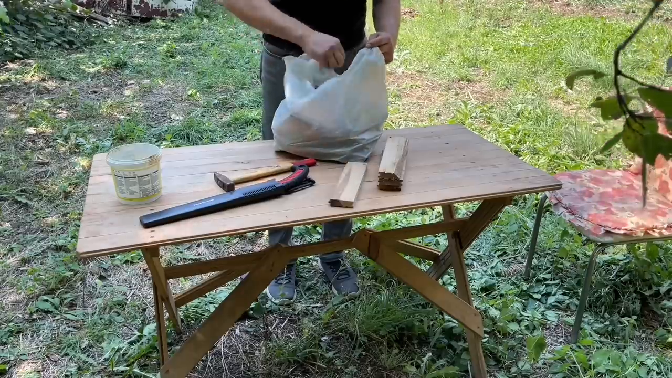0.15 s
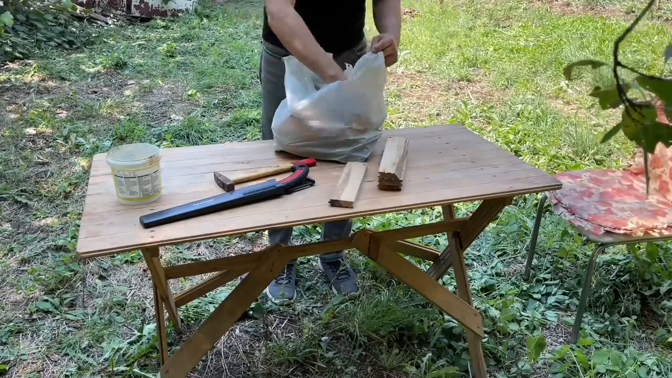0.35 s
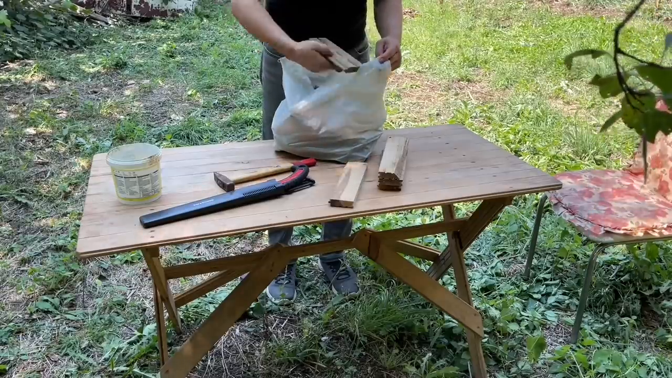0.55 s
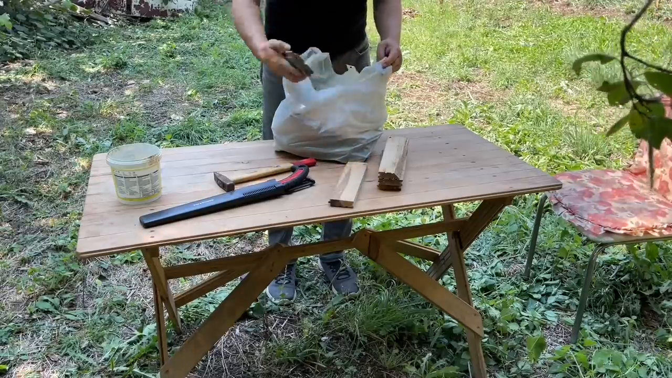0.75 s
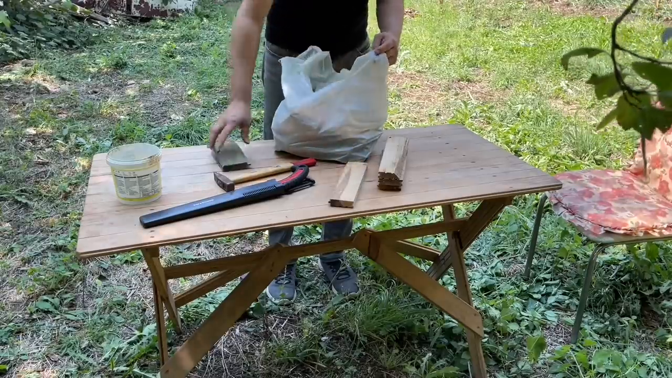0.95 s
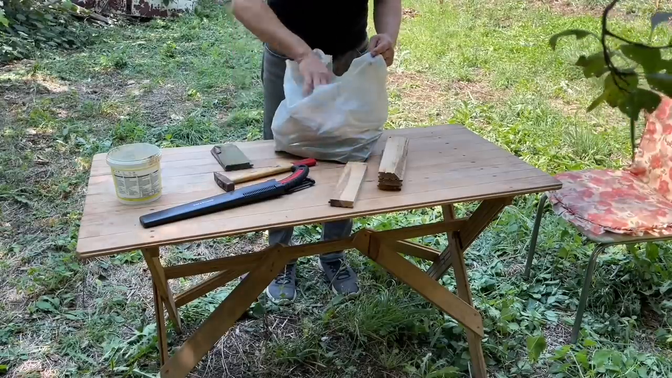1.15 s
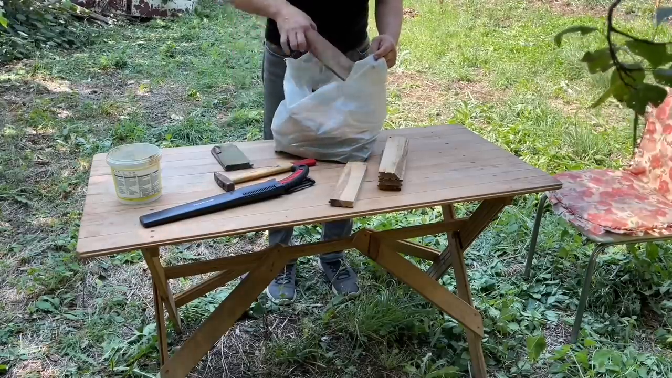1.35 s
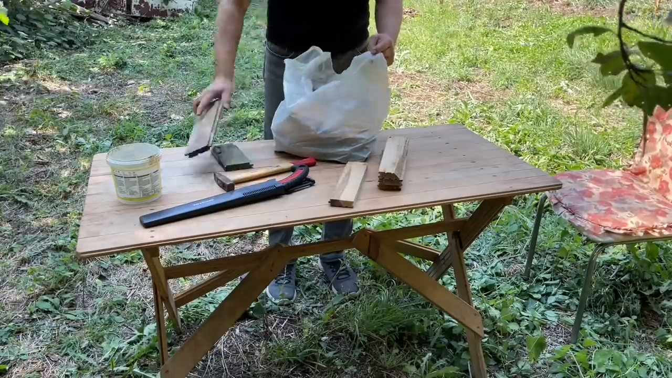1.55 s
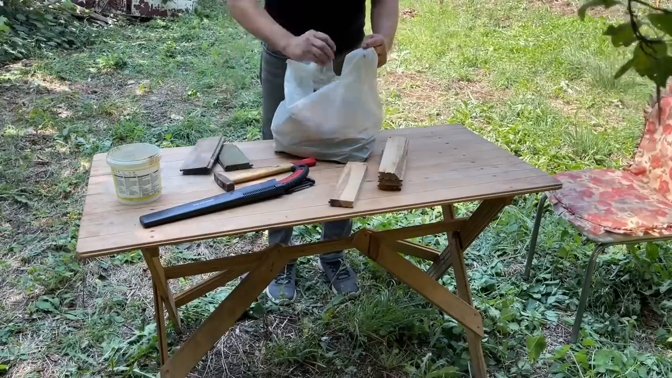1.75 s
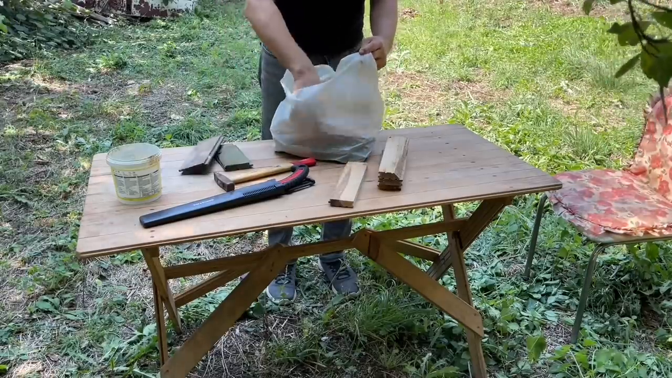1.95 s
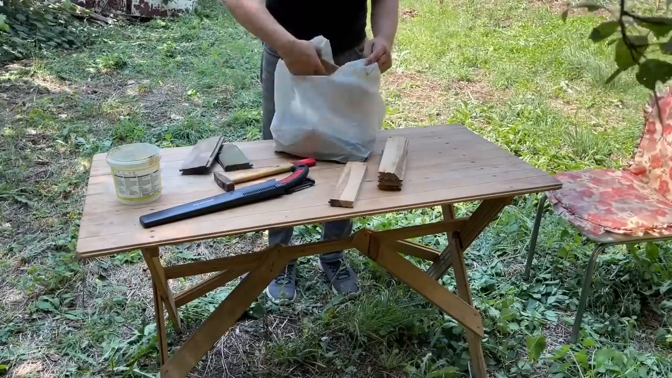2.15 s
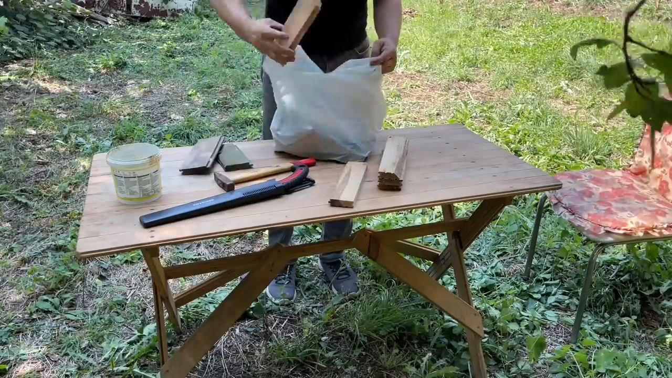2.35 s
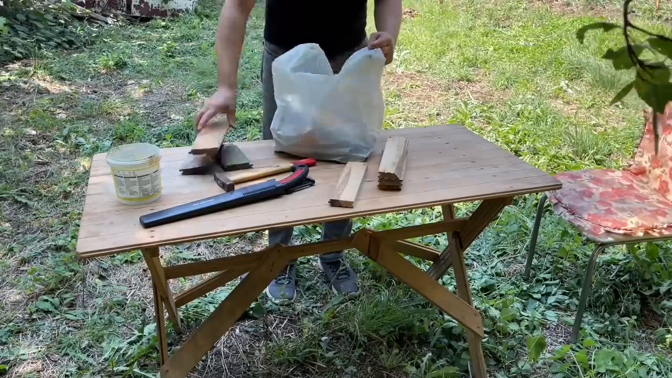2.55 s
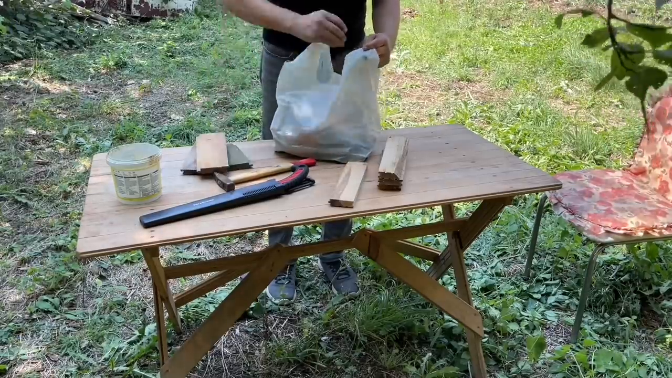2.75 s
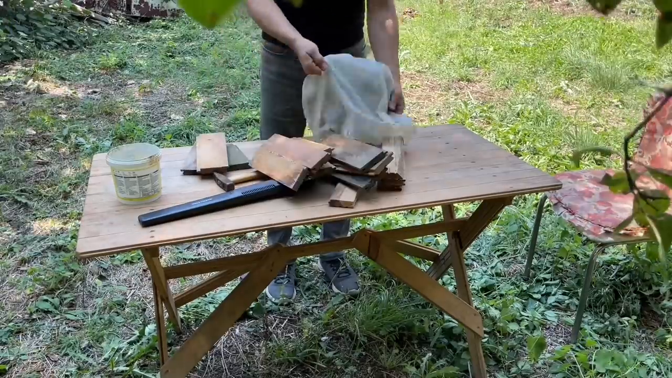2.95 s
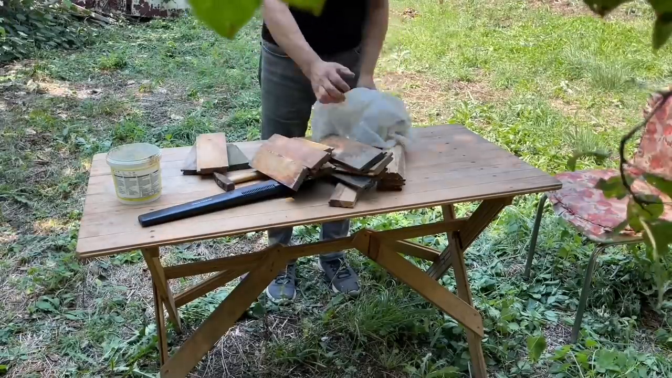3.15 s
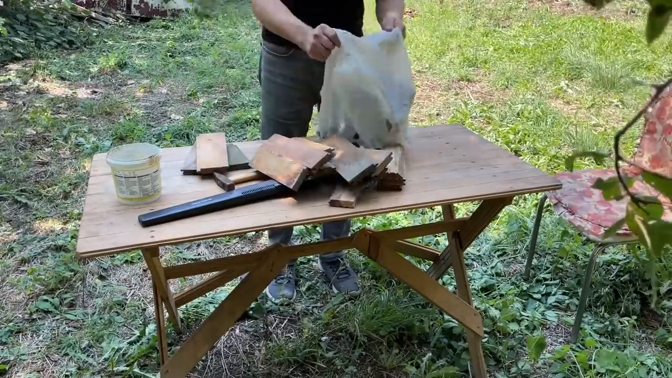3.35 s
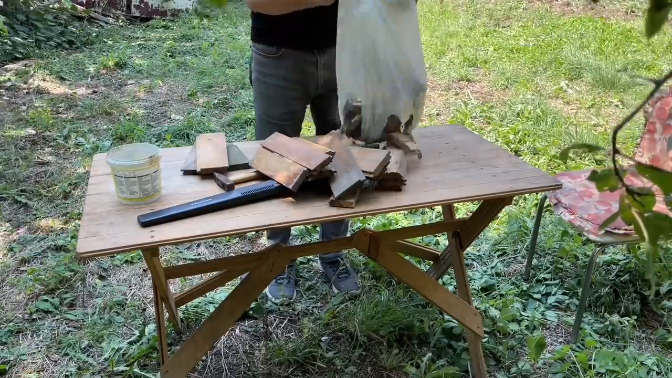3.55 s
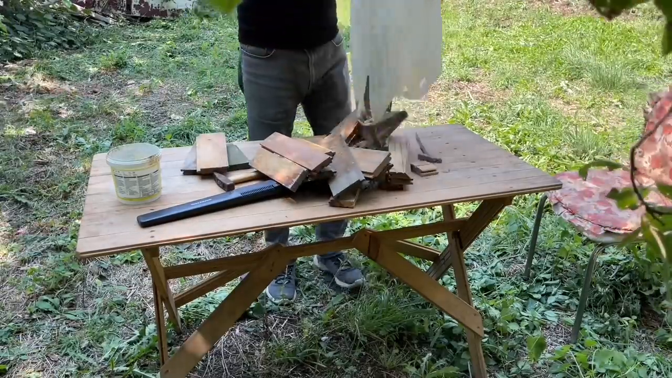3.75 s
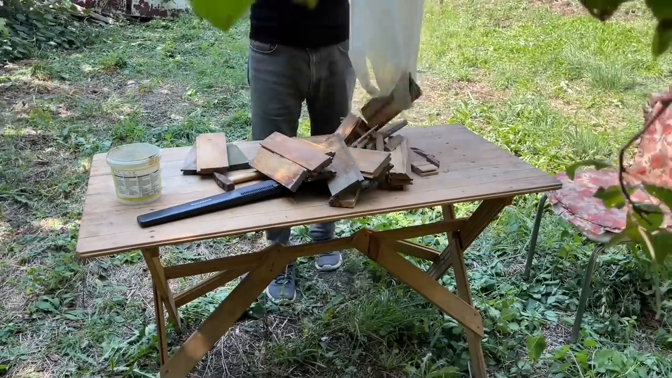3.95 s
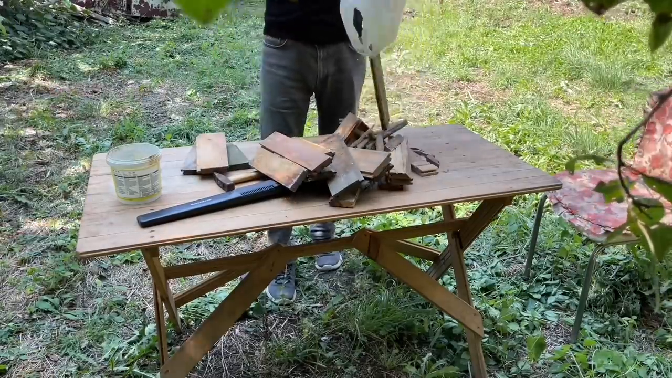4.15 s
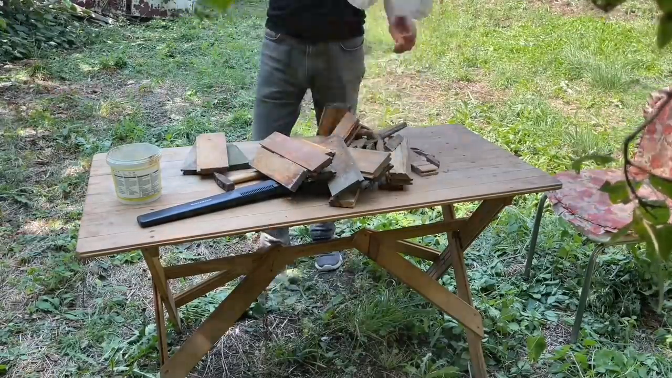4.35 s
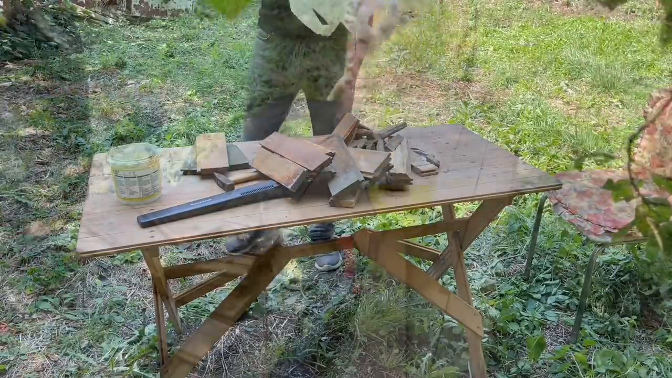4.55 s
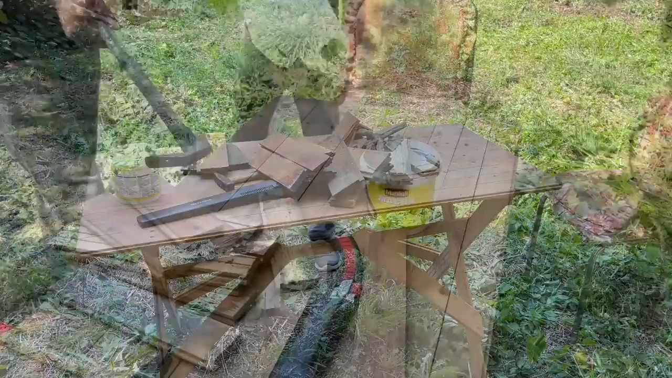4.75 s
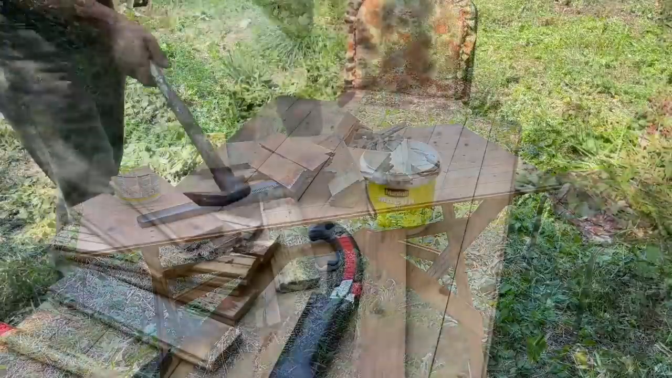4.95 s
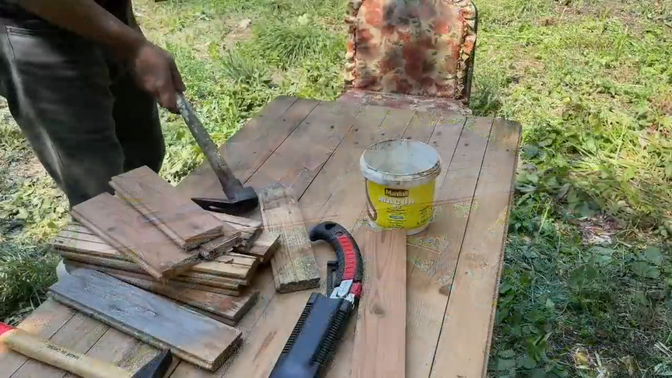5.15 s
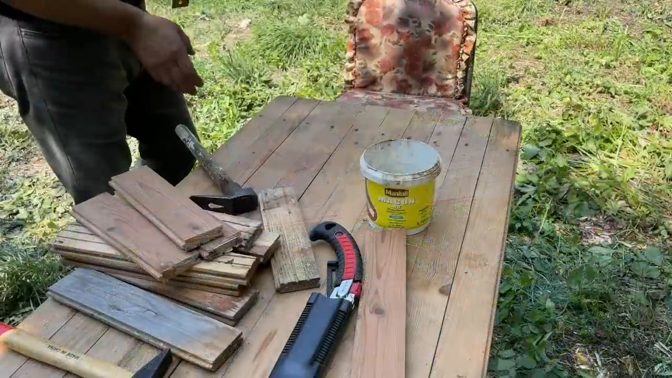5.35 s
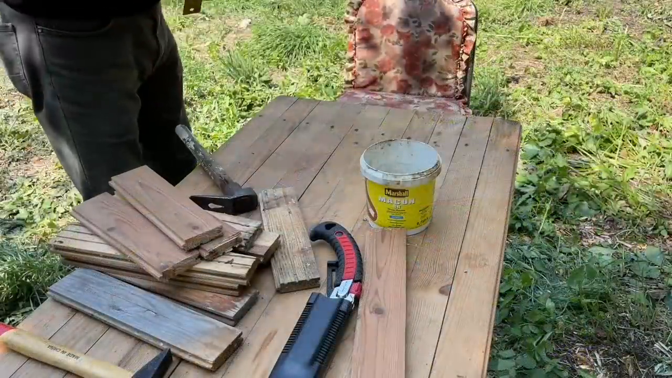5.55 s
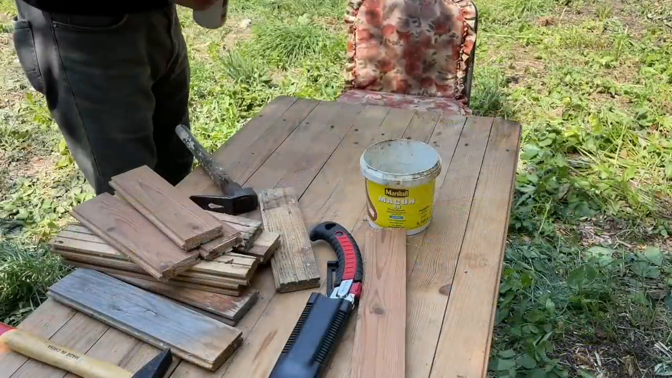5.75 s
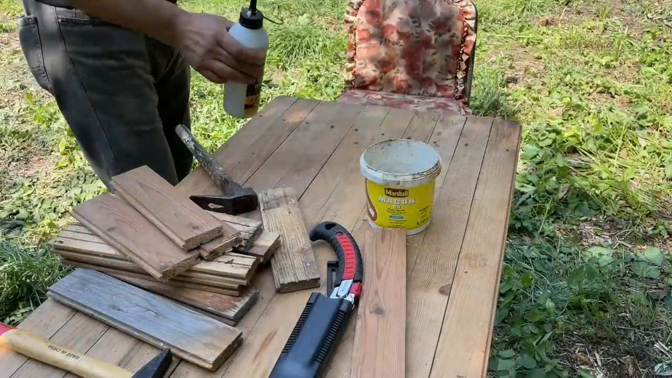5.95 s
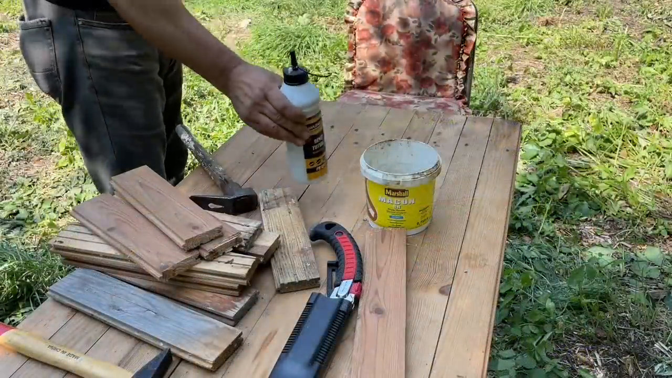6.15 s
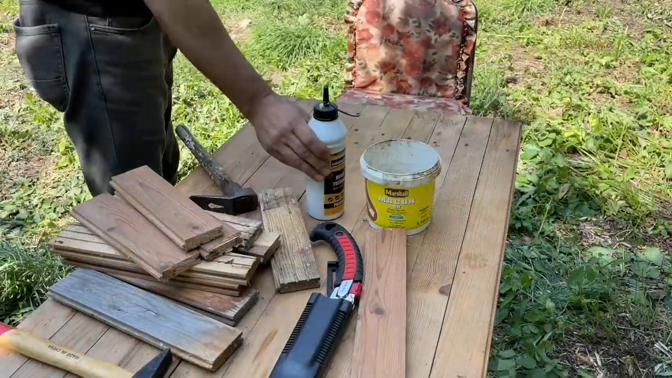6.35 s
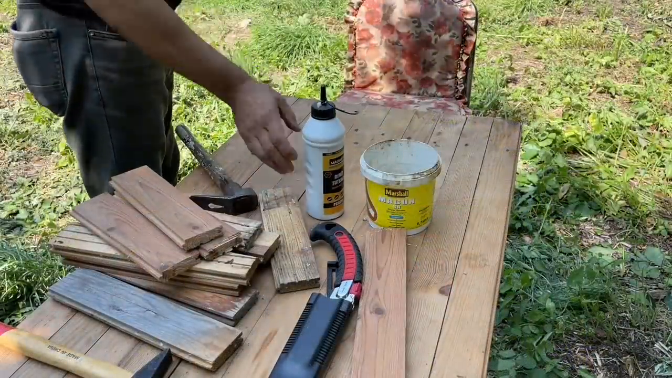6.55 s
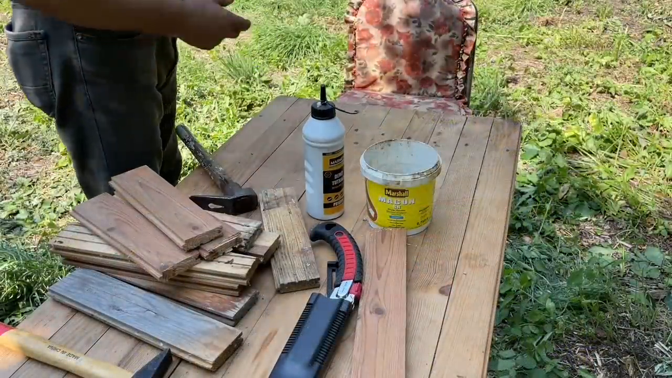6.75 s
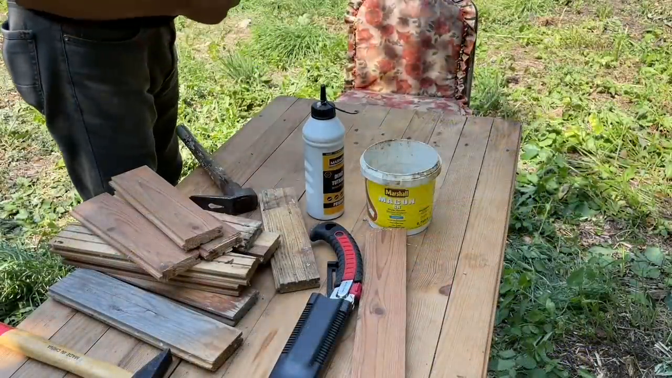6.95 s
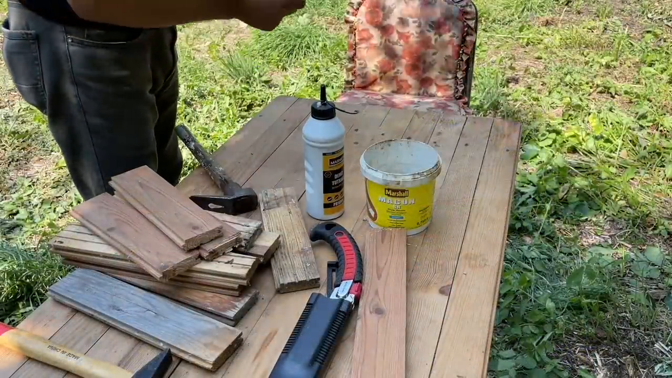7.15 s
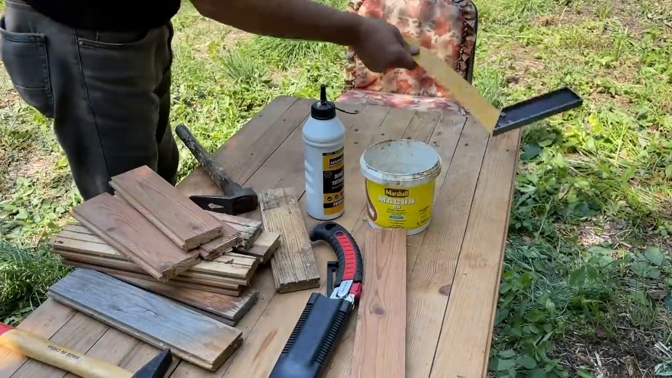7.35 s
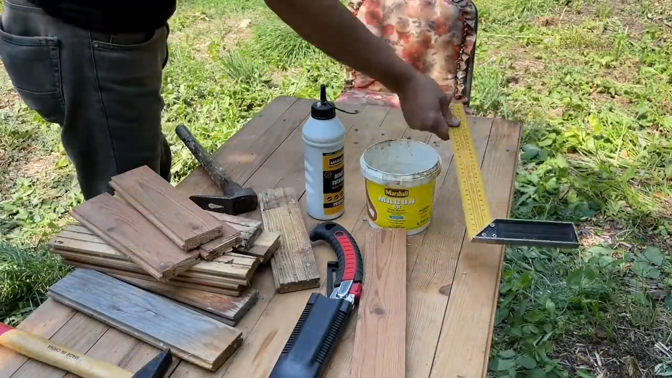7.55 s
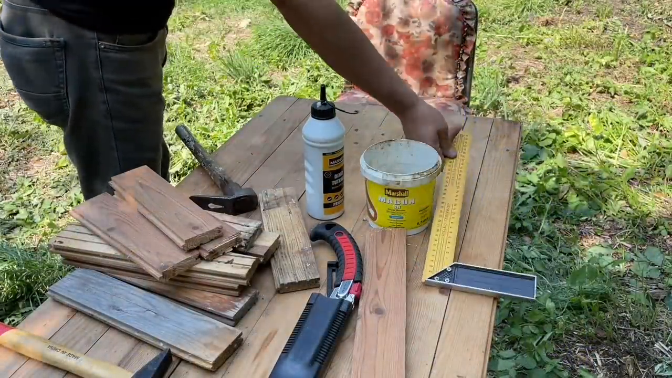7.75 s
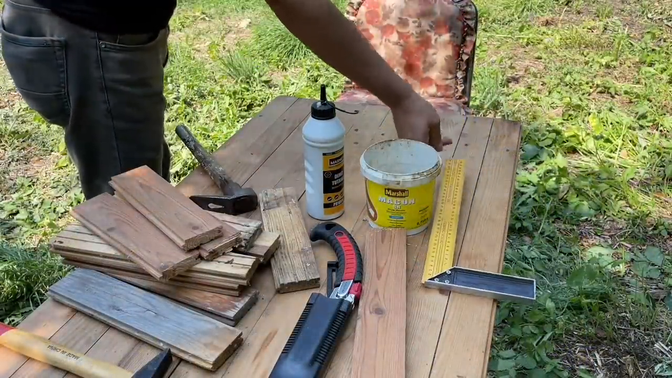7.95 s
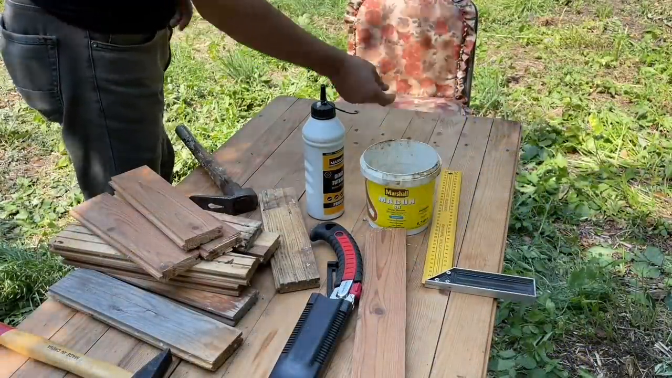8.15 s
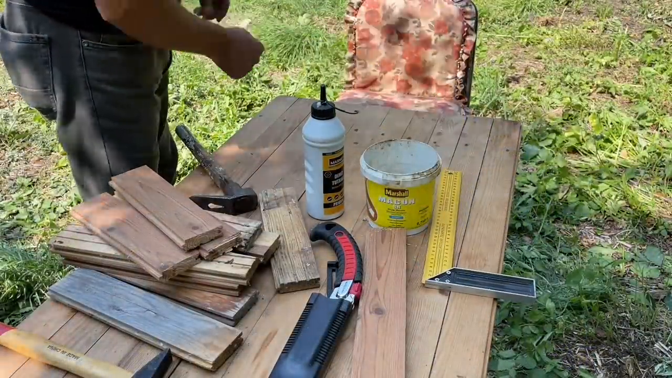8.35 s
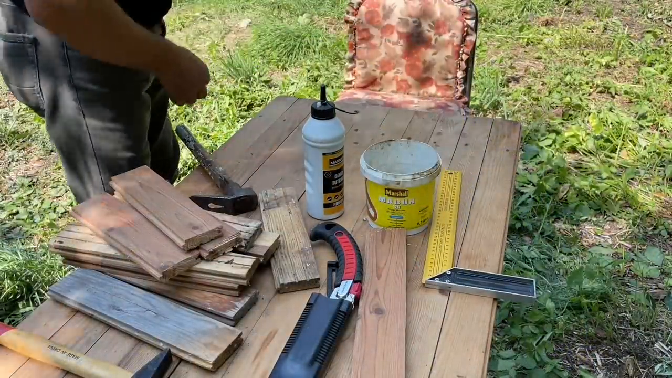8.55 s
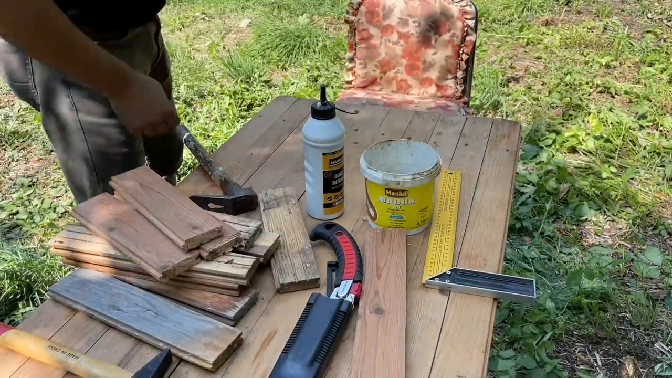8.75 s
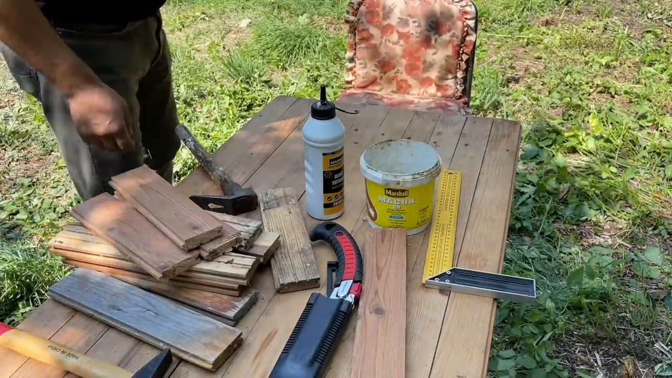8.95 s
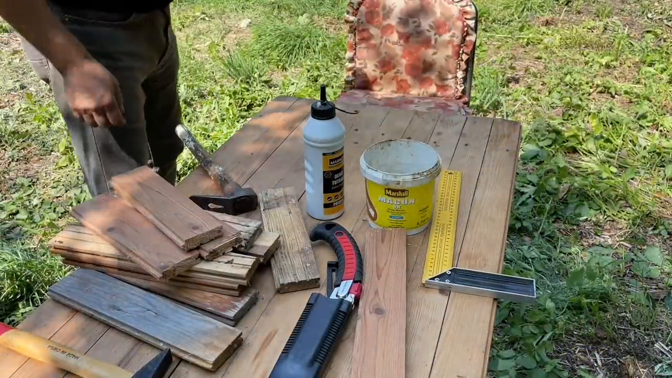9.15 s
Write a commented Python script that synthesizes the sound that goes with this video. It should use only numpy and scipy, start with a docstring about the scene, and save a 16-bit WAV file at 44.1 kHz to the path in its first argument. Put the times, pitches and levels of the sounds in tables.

```python
"""Offcuts of wood knock on a plank table outdoors: each blow shakes many short-lived modes of piece and planks.
They are lifted from a rustling plastic bag, whose film crackles in tiny snaps of noise, then tipped out.
From a second, duller viewpoint a hammer, a bottle and a steel square are set down with small clicks;
ringing steel modes and knocking wood let the square rattle to rest.
Wind, made of low noise and lone wobbly bursts, buffets the microphone over a faint hiss of filtered noise."""
import sys
import numpy as np
from scipy import signal
from scipy.fft import rfft, irfft, next_fast_len
from scipy.io import wavfile
from scipy.ndimage import uniform_filter1d, map_coordinates

SR = 44100
rng = np.random.default_rng(int(sys.argv[2]) if len(sys.argv) > 2 else 0)


def generate_wav(signal):
    """Clip the signal to [-1, 1] and save it as 16-bit WAV at the path in sys.argv[1]."""
    frames = np.transpose(np.atleast_2d(signal))
    scaled = np.clip(frames, -1, 1) * 32767
    pcm = np.round(scaled).astype(np.int16)
    wavfile.write(sys.argv[1], SR, pcm)


N = 409239
T = np.arange(N) / SR  # time [s]
LEFT_RIGHT = np.array([[1], [-1]])
OCTAVE = np.arange(-3.5, 4, .5)[:, None]  # half-octave groups of modes, in octaves from 1 kHz
TIP_S = 2.85  # the bag is tipped out from here on
CHANGE_S, CHANGE_LENGTH_S = 4.45, 0.01  # fade to the second viewpoint


def undb(db):
    """Turn dB into gain."""
    return 10 ** (np.asarray(db) / 20)


def unit(x):
    """Scale to rms 1."""
    return x / np.sqrt(np.mean(x ** 2))


def peak(x, db):
    """Scale to a peak level [dB]."""
    return x * undb(db) / np.max(np.abs(x))


def curve(spans):
    """Join the columns of a table by straight lines over time; silent outside it."""
    s, *columns = np.transpose(np.concatenate(spans))
    return [np.interp(T, s, c, left=-120, right=-120) for c in columns]


def colour(x, points):
    """Filter by (frequency [Hz], level [dB]) points, then scale to rms 1."""
    hz, db = np.transpose(points)
    size = next_fast_len(N)
    f = np.maximum(np.arange(size // 2 + 1) * SR / size, 1)
    gain = undb(np.interp(np.log(f), np.log(hz), db))
    return unit(irfft(rfft(x, size) * gain, size)[..., :N])


def band(x, lo_hz, hi_hz):
    """Keep the sound between two frequencies."""
    return signal.sosfilt(signal.butter(2, [lo_hz, hi_hz], "band", fs=SR, output="sos"), x)


def walk(rate):
    """Random levels held for 1 / rate seconds and smoothed; spread 1."""
    k = int(SR / rate)
    steps = np.repeat(rng.standard_normal(N // k + 1), k)
    return unit(uniform_filter1d(uniform_filter1d(steps, k), k)[:N])


def wide(alike):
    """Two-channel noise from a shared and an opposed part."""
    mid, side = rng.standard_normal((2, N))
    return np.sqrt(1 + alike) * mid + np.sqrt(1 - alike) * side * LEFT_RIGHT


def ring(push, modes, length_s=0.33):
    """Drive dying sine tones, the modes (Hz, dB, seconds to fall 60 dB), with a push."""
    hz, db, t60 = np.transpose(modes)[..., None]
    t = T[:int(length_s * SR)]
    tones = undb(db) * np.exp(-np.log(1000) * t / t60) * np.sin(2 * np.pi * hz * t)
    return signal.fftconvolve(push, np.sum(tones, axis=0))


def add(out, s, x):
    """Mix x in from time s."""
    i = int(s * SR)
    out[..., i:i + x.shape[-1]] += x[..., :N - i]


def chatter(fade_s, hold_s=0, rise_s=0.000076, rough_db=11.5):
    """An edge never lands at once: a quick cluster of uneven micro-contacts that dies away."""
    t = T[:2048]
    uneven_db = rough_db * np.repeat(rng.standard_normal(len(t) // 16), 16)
    sizes = rng.standard_normal(len(t)) * undb(uneven_db)
    fade = np.exp(-np.log(1000) * np.maximum(t - hold_s, 0) / fade_s)
    return sizes * (1 - np.exp(-t / rise_s)) * fade


# Tone of the hiss at the first viewpoint: (frequency [Hz], relative level [dB per Hz])
HISS_FIRST_COLOUR = [(24, -76), (40, -16), (115, 7), (337, -8.5), (1300, -14), (16000, -25)]


def hiss_first(level_db=-54.5):
    """Faint garden hiss at the first viewpoint: steady noise, tinted by a filter."""
    return undb(level_db) * colour(wide(0.37), HISS_FIRST_COLOUR)


# Tone of the hiss at the second viewpoint: (frequency [Hz], relative level [dB per Hz])
HISS_SECOND_COLOUR = [(71, -35), (120, -1.5), (455, -4), (2710, -15), (6940, -19), (8610, -14.5),
                      (11300, -21.5), (13000, -53)]


def hiss_second(level_db=-51):
    """Faint garden hiss at the second viewpoint: steady noise, tinted by a filter."""
    return undb(level_db) * colour(wide(0.38), HISS_SECOND_COLOUR)


# Strength of the wind before its puffs: (time [s], level [dB])
WIND_LEVEL = [
    [(4.425, -68), (4.704, -61), (4.929, -58.5), (5.488, -43), (5.607, -50.5), (5.927, -51), (6.236, -38.5),
     (7.184, -34.5), (7.802, -40), (8.301, -48.5), (8.556, -54), (8.73, -45.5), (9.015, -58), (9.28, -66)],
]
# Tone of the wind: (frequency [Hz], relative level [dB per Hz])
WIND_TONE = [(15, -49), (28, -6), (43, -1), (65, 6.5), (120, -2), (311, -23.5), (500, -26.5), (700, -68)]


def wind(gust_db=4.5):
    """Wind rumble: low noise whose level wanders in puffs."""
    rumble = colour(wide(0.88), WIND_TONE)
    return rumble * undb(curve(WIND_LEVEL)[0] + gust_db * walk(26))


# Single eddies that burst on the microphone: (start time [s], peak level [dB], mean frequency [Hz])
EDDY_BURSTS = [(0.784, -31.5, 116), (0.817, -36.5, 135), (1.031, -38, 120), (1.147, -35, 177),
               (1.188, -33.5, 116), (1.246, -36, 119), (1.317, -31, 184), (1.398, -31.5, 118),
               (1.852, -35, 132), (1.878, -25.5, 151), (2.064, -29.5, 136.6), (2.122, -37, 135),
               (2.186, -34.5, 164), (2.452, -36.5, 168), (2.48, -38, 127), (2.529, -24.5, 160.5),
               (2.564, -37, 109), (7.855, -27, 186), (7.918, -24.5, 146)]


def eddies(eddy_s=0.01):
    """Lone wind bursts: a few cycles of a low tone with wobbling pitch, swelling and dying."""
    out, t = np.zeros(N), T[:8192] / eddy_s
    for s, db, hz in EDDY_BURSTS:
        drift = unit(uniform_filter1d(rng.standard_normal(len(t)), 300))
        cycles = np.cumsum(hz * (1 + 0.46 * drift)) / SR
        add(out, s, peak(t * np.exp(-t) * np.sin(2 * np.pi * cycles), db))
    return out


# Each tug at the bag is one rustle: (loudest time [s], level [dB], length [s])
BAG_TUGS = [(0.054, -45.5, 0.14), (0.256, -43, 0.055), (0.366, -46, 0.08), (1.24, -47.5, 0.1),
            (1.314, -51.5, 0.09), (1.667, -51, 0.093), (1.881, -46.5, 0.18), (2.052, -43.5, 0.25),
            (2.132, -44.5, 0.33), (2.35, -48, 0.086), (2.401, -43, 0.048), (2.59, -55.5, 0.34),
            (2.983, -33, 0.33), (3.342, -34.5, 0.44), (3.514, -41.5, 0.34), (3.646, -27.5, 0.079),
            (3.722, -31, 0.11), (3.81, -36, 0.24), (3.969, -37.5, 0.094), (4.044, -40, 0.052),
            (4.164, -48, 0.46)]


def tugs(rise_share=0.36, edge_db=-17):
    """Gain of the rustling: every tug swells to its peak and dies away a little more slowly."""
    power, t = np.zeros(N), T[:5 * SR]
    for s, db, length in BAG_TUGS:
        # 0 at the peak, 1 at both ends of the tug, where the level is edge_db below the peak
        away = np.maximum((s - t) / rise_share, (t - s) / (1 - rise_share)) / length
        near = away < 4
        power[:len(t)][near] += undb(db + edge_db * away[near]) ** 2
    return np.sqrt(power)


# Filter that tints the plastic film: (frequency [Hz], relative level [dB per Hz])
FILM_COLOUR = [(120, -32), (200, -3), (683, -3), (899, -12), (1230, -4), (16000, -14)]


def bag(snaps_per_s=1500, spread_db=3.5, hush_db=-4.5):
    """Creases of thin film snap in flurries of short grains, each size on its own, over a softer swish."""
    film, shared = undb(hush_db) * wide(0.67), walk(60)
    for lo_hz in 150 * 3. ** np.arange(4):
        snaps = (rng.random(N) < snaps_per_s / SR) * undb(spread_db * rng.exponential(size=N))
        # most of each snap is over within a millisecond
        flutter = signal.lfilter([1], [1, -.93], snaps) * rng.standard_normal(N)
        top_hz = 3 * lo_hz if lo_hz < 4000 else 20000
        flurry_db = 1.9 * shared + 1.75 * walk(40)
        film = film + band(unit(flutter), lo_hz, top_hz) * undb(flurry_db)
    return colour(film, FILM_COLOUR) * tugs()


def clicks(events, modes):
    """Tiny hard contacts set a few modes ringing; each click favours other modes."""
    out = np.zeros(N)
    for s, db in events:
        uneven = np.array(modes) + [0, 3, 0] * rng.standard_normal((len(modes), 1))
        add(out, s, peak(ring(chatter(0.0024), uneven), db))
    return out


# Small bright ticks of a bottle cap: (time [s], peak level [dB])
CAP_TICKS = [(5.5844, -32), (5.595, -29), (5.608, -27.5), (5.6155, -30), (5.635, -31.5), (5.7126, -29.5)]
# How the cap rings: (frequency [Hz], relative level [dB], time to fall 60 dB [s])
CAP_MODES = [(3336, -2, 0.09), (5340, -4, .02), (6480, 1, 0.013), (7760, 2, 0.015), (8800, 12, 0.013),
             (10650, 9.5, 0.013)]


def cap_ticks():
    """Hard plastic clicks of the cap: short, mostly high modes."""
    return clicks(CAP_TICKS, CAP_MODES)


# A lifted tool clinks faintly: (time [s], peak level [dB])
TOOL_CLINKS = [(4.678, -49), (4.732, -38), (4.806, -43.5)]
# How the tool rings: (frequency [Hz], relative level [dB], time to fall 60 dB [s])
TOOL_MODES = [(1120, -13, 0.2), (2550, 1, 0.047)]


def tool_clinks():
    """Small metal clinks: two modes, the lower one lasting longer."""
    return clicks(TOOL_CLINKS, TOOL_MODES)


# Modes of the steel square: (frequency [Hz], relative level [dB])
STEEL_MODES = [(1570, -2.5), (1920, -6.5), (2130, -2), (2420, -4), (2845, -7), (3330, -8), (4100, -22),
               (4660, -19), (5490, -21), (5680, -13), (7430, -16), (8200, -13), (9620, -13.5), (9815, -5.5),
               (10790, -12), (11860, -8), (11910, -11)]
# Landing, lift, rebound and coming to rest: (time [s], steel ring level [dB], clatter on the wood level [dB])
SQUARE_RATTLE = [
    [(7.976, -15.5, -13), (8.022, -19, -34.5), (8.058, -22, -30.5), (8.13, -27, -28.5), (8.266, -70, -42.5),
     (8.36, -72, -64)],
]
# Distinct rebounds of the blade: (time [s], peak level [dB])
BLADE_REBOUNDS = [(8.054, -8), (8.072, -6), (8.096, -18), (8.134, -19), (8.187, -25), (8.239, -35)]
# Modes of the raised handle end: (frequency [Hz], relative level [dB])
HANDLE_MODES = [(2335, -7), (2725, 0)]


def square(lying_t60=0.048, handle_t60=0.9, haze_db=-4.5, knock_db=3.0, free_db=-28.5):
    """The blade slaps the wood in a fast rattle that keeps its modes ringing; lying down, they die fast."""
    steel_db, wood_db = curve(SQUARE_RATTLE)
    slaps = (rng.random(N) < 1500 / SR) * rng.standard_normal(N)
    modes = np.array([(hz, db, lying_t60) for hz, db in STEEL_MODES])
    high = modes[:, 0] > 3000

    # the raised handle end rings on after the landing
    free = np.zeros(N)
    handle = [(hz, db, handle_t60) for hz, db in HANDLE_MODES]
    landing_s = SQUARE_RATTLE[0][0][0]
    add(free, landing_s, peak(ring(chatter(0.0012), handle, length_s=0.44), free_db))

    # modes too dense to tell apart make a haze
    haze = unit(band(rng.standard_normal(N), 5300, 14000))
    steel = unit(ring(slaps, modes[high])[:N]) + undb(haze_db) * haze

    def knock(x):
        """Dull knock of the wood under the steel."""
        return unit(band(x, 400, 2250))

    # every slap leaves a few milliseconds of shaking
    shaken = uniform_filter1d(np.abs(slaps), 200, origin=99) * rng.standard_normal(N)
    for s, db in BLADE_REBOUNDS:
        push = chatter(0.0098)
        blade = ring(push, modes[modes[:, 0] < 4000])
        under = np.pad(knock(push), (0, len(blade) - len(push)))
        add(free, s, peak(unit(blade) + 2 * under, db))
    clatter = unit(ring(slaps, modes[~high])[:N]) + undb(knock_db) * knock(shaken)
    return undb(steel_db) * unit(steel) + undb(wood_db) * unit(clatter) + free


SIDE_DB = -15  # opposed part of the dense modes


def mode_grain():
    """One second of noise for each half-octave group of modes."""
    centres = 1000 * 2 ** OCTAVE[:, 0]
    return np.array([unit(band(rng.standard_normal(SR), f / 1.2, f * 1.2)) for f in centres])


def dense_modes(push, grain, db, t60, damping):
    """Modes too many to count: noise groups fed with the energy of the push; higher ones die sooner."""
    energy = np.pad(push ** 2, (0, 6000))
    keep = np.exp(-2 * np.log(1000) / (SR * t60 * 2 ** (-damping * OCTAVE[:, 0])))
    stored = np.array([signal.lfilter([1], [1, -k], energy) for k in keep])
    level = undb(db) * np.sqrt(stored)
    parts = []
    for start in rng.integers(SR, size=2):
        noise = np.take(grain, start + np.arange(len(energy)), axis=1, mode="wrap")
        parts.append(np.sum(level * noise, axis=0))
    mid, side = parts
    return mid + undb(SIDE_DB) * side * LEFT_RIGHT  # each mode radiates in its own direction


def piece_shape(knee=2.22, fall_db=-18.0, bass_db=7.0):
    """A small piece radiates little bass; its contact is too soft to reach far past the knee [octaves]."""
    return bass_db * np.minimum(OCTAVE, 0) + fall_db * np.maximum(OCTAVE - knee, 0)


def tumbling(out, grain, tumble_db=-17.0, ping_db=8, ping_t60=0.019):
    """Small pieces tumble over each other as long as the tipped bag is shaken; some ping."""
    shaking = tugs()
    bumps = (rng.random(N) < 140 / SR) * rng.standard_normal(N) * shaking * undb(tumble_db)
    start, stop = int(TIP_S * SR), int(CHANGE_S * SR)
    add(out, TIP_S, dense_modes(bumps[start:stop], grain, piece_shape() - 0.28 * OCTAVE, 0.084, 0.091))
    for when, pitch, size in rng.random((110, 3)):
        i = int(start + when * (stop - start))
        modes = [(1500 * 5 ** pitch, 0, ping_t60)]  # each ping has its own pitch
        ping = peak(ring(chatter(.004), modes, length_s=.05), ping_db - 12 * size)
        add(out, i / SR, shaking[i] * ping)


# Heavy tools bend the whole table top: (frequency [Hz], relative level [dB], time to fall 60 dB [s])
TOP_BENDING = [(73, -29, 0.72), (142, 18, 0.083)]
# They also set its planks ringing: (frequency [Hz], relative level [dB])
PLANK_RINGING = [(368, 3.5), (650, -1), (842, 0), (1190, -6.5), (1330, -4), (1620, -4), (1860, -14)]
FLEX_DB, BOTTLE_FLEX_DB = -5.5, 2  # relative to the thump; the full bottle lands softer and heavier
BOTTLE_FROM_S, BOTTLE_TO_S = 6.2, 6.35


def table_top(out, s, push, thump_db, plank_db=-6.5, plank_t60=0.17):
    """A heavy tool bends the table top slowly and makes its planks ring."""
    flex_db = BOTTLE_FLEX_DB if BOTTLE_FROM_S < s < BOTTLE_TO_S else FLEX_DB
    add(out, s, peak(ring(np.abs(push), TOP_BENDING), thump_db + flex_db))
    planks = [(hz, db, plank_t60) for hz, db in PLANK_RINGING]
    add(out, s, peak(ring(chatter(0.0023), planks), thump_db + plank_db))


# Blows: (time [s], peak level [dB], ring frequency [Hz], ring level relative to the peak [dB],
# weight: table thump relative to the peak [dB], hardness: tilt above 1 kHz [dB per octave])
BLOWS = [(0.499, -32.5, 2520, 2, -29, 9), (0.952, -13.5, 3155, -5, -28, -0.5),
         (0.974, -5, 1054, -12.5, -37, 2), (1.004, -21.5, 1440, -14, -23, -1.5),
         (1.612, -17.5, 1170, -5.5, -5.5, -0.5), (1.639, -21.5, 1350, 0, 3.5, -2),
         (1.651, -13.5, 1286, -6.5, -32, 1.5), (1.697, -27.5, 1202, -0.5, -2.5, -8),
         (1.805, -37.5, 1066, -17, -3.5, -35), (2.621, -14.5, 1390, -6, -18, -5),
         (2.6442, -8.5, 2770, -13, -12.5, 6.5), (2.656, -15, 2750, -7, -33, 2),
         (2.703, -29, 1216, -5, -9.5, -4), (2.935, -23, 1770, -8, -28, 8), (2.951, -11, 2830, -11, -4.5, 0),
         (2.967, -13.5, 1200, -10, -31, 6), (3.005, -25.5, 1060, -7, 3, -18),
         (3.328, -25, 2720, -7, -20, 7), (3.407, -23, 1190, -15, -6.5, 19),
         (3.504, -25.5, 2630, -10, -12, 6), (3.568, -16.5, 3300, -7, -13.5, 5.5),
         (3.596, -20, 3180, -19, -11, 3), (3.652, -20, 1180, -8, 1.5, 6),
         (3.669, -11.5, 1220, -15, -6.5, 7), (3.725, -11.5, 2210, -6, -9.5, 5.5),
         (3.752, -22, 1240, 2.5, -27, 8), (3.769, -15, 2450, -11, -0.5, 6), (3.79, -9.5, 3330, -2, -34, 7),
         (3.817, -1, 3310, -7, -19.5, 5.5), (3.866, -22.5, 2830, -11, -8.5, 5),
         (3.948, -28.5, 2200, -3, -15, 7), (4.275, -44, 1190, -25, 7.5, -29),
         (4.342, -8.5, 2460, -10, -37, 3), (4.363, -2, 2340, -8.5, -34, 3.5),
         (4.996, -3.5, 843, -6.5, -9.5, -9), (5.141, -41.5, 856, -18, 2, -45),
         (5.226, -35.5, 880, -26, 4.5, -64), (5.242, -23.5, 790, -7, -20, -39),
         (5.266, -16, 895, -23, -24, -42), (5.285, -3, 2420, -5.5, -4.5, -3.5),
         (5.324, -17, 2210, -2.5, -14, -6.5), (6.302, -17.5, 920, -21, 5.5, -21),
         (6.3098, -3.5, 2490, -8.5, -1, -8.5), (6.406, -36, 1380, 0, 0, -8), (7.692, -6, 870, -14, -8, -6),
         (7.719, -16.5, 1620, -4, -13, -9.5), (7.755, -23.5, 1150, -6, -3.5, -14),
         (7.822, -22.5, 885, -20, -6, -9), (7.98, -9.5, 2250, 6.5, -17, 5)]
# How the table top answers a blow: (frequency [Hz], relative level [dB])
TABLE_ANSWER = [(90, -63), (150, -4.5), (400, 15.5), (900, 1), (2200, 10), (6000, -3)]
DWELL_S = 0.0093  # a full-scale blow of a heavy tool presses this long before settling, weaker ones less


def wood(piece_t60=0.046, table_t60=0.12, ring_t60=0.041, fade_s=0.011, crack_db=-19.0):
    """Each contact shakes the piece (short dense modes and one clear ring) and the table below."""
    out = np.zeros((2, N))
    grain = mode_grain()
    hz, answer_db = np.array(TABLE_ANSWER).T
    table_db = np.interp(OCTAVE, np.log2(hz / 1000), answer_db)
    above = np.maximum(OCTAVE, 0)  # octaves above 1 kHz
    for s, db, ring_hz, ring_db, thump_db, tilt_db in BLOWS:
        heavy = s > CHANGE_S
        soft_db = min(tilt_db, 0)
        push = chatter(fade_s, DWELL_S * heavy * min(undb(db), 1))
        piece = dense_modes(push, grain, piece_shape() + tilt_db * above, piece_t60, 0.53)
        table = dense_modes(push, grain, table_db + 0.18 * soft_db * above, table_t60, 0.29)
        body = peak(piece, 0) + peak(table, thump_db)
        add(body, 0, peak(np.diff(chatter(.006), 2), crack_db + soft_db))  # hard edges crack
        add(out, s, undb(db) * body)
        if heavy:
            table_top(out, s, push, db + thump_db)
        add(out, s, peak(ring(push, [(ring_hz, 0, ring_t60)]), db + ring_db))
    tumbling(out, grain)
    return out


def ports(x, turn_hz=9790, width_hz=1000):
    """At the second viewpoint the left port turns the phase of the treble (an all-pass)."""
    r = np.exp(-np.pi * width_hz / SR)
    poles = [1, -2 * r * np.cos(2 * np.pi * turn_hz / SR), r * r]
    return np.array([signal.lfilter(poles[::-1], poles, x[0]), x[1]])


PAN_FIRST_DB, PAN_SECOND_DB, PAN_SQUARE_DB = 1.5, 4, 1.5  # left louder than right
LAG_SAMPLES, DULL_HZ = 0.57, 12400  # delay of the right port; treble limit of the second viewpoint
DIP_S, DIP_LENGTH_S, DIP_DB = 2.826, .012, -14


def scatter(hits):
    """Ground and leaves scatter a short tail of noise, different in each channel."""
    t = T[:8000]
    tail = band(rng.standard_normal((2, len(t))), 136, 11000) * np.exp(-np.log(1000) * t / 0.16)
    return undb(-42.0) * signal.fftconvolve(hits, tail, axes=1)[:, :N]


def scene():
    """Both viewpoints, joined by a short fade."""
    second = np.clip((T - CHANGE_S) / CHANGE_LENGTH_S + .5, 0, 1)
    pan_db = np.where(T > 7, PAN_SQUARE_DB, PAN_FIRST_DB + second * (PAN_SECOND_DB - PAN_FIRST_DB))
    hits = wood() + cap_ticks() + tool_clinks() + square()
    hits[1] = map_coordinates(hits[1], [np.arange(N) - LAG_SAMPLES])  # blows reach the left port first
    near = hits * undb(LEFT_RIGHT * pan_db / 2) + scatter(hits) + bag() + eddies()

    wind_filter = signal.butter(3, 80, "high", fs=SR, output="sos")
    first = signal.sosfilt(wind_filter, near + hiss_first())

    dull = signal.sosfilt(signal.ellip(6, .2, 50, DULL_HZ, fs=SR, output="sos"), near)
    dull = signal.sosfilt(signal.butter(2, 45, "high", fs=SR, output="sos"), dull)
    dull = ports(dull + hiss_second())

    # the level dips briefly
    dip = undb(DIP_DB * np.exp(-((T - DIP_S) / DIP_LENGTH_S) ** 2))
    return dip * ((1 - second) * first + second * dull + wind())


def record(dry):
    """Round the peaks softly and cut everything above 15.9 kHz."""
    return signal.sosfilt(signal.ellip(8, .2, 80, 15900, fs=SR, output="sos"), np.tanh(dry))


dry = scene()
out = record(dry)
generate_wav(out)
```